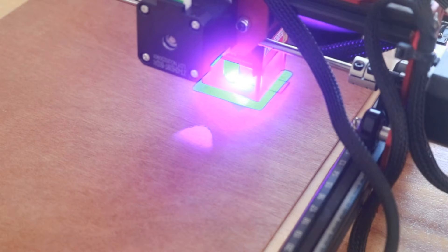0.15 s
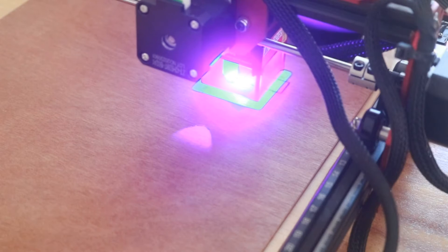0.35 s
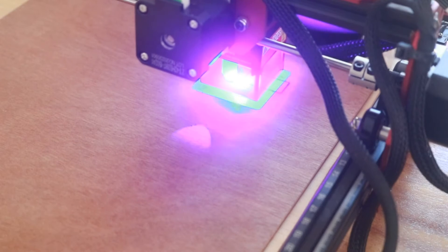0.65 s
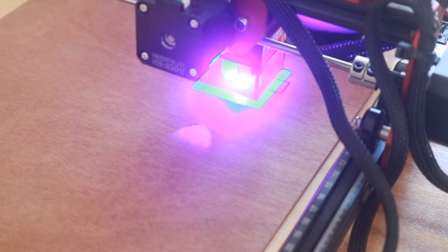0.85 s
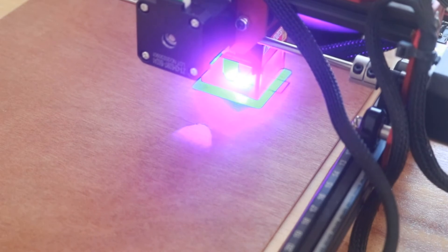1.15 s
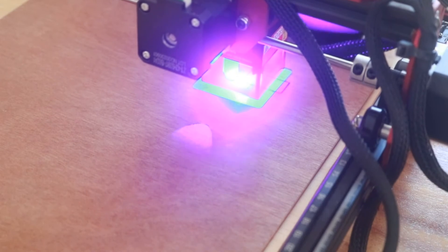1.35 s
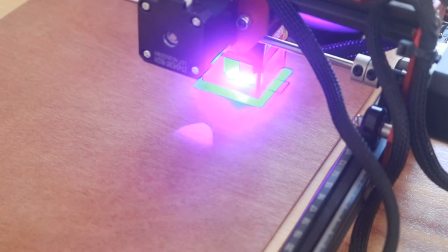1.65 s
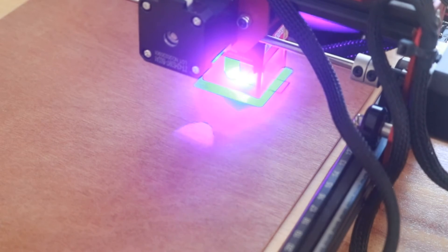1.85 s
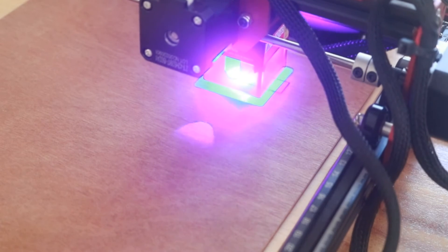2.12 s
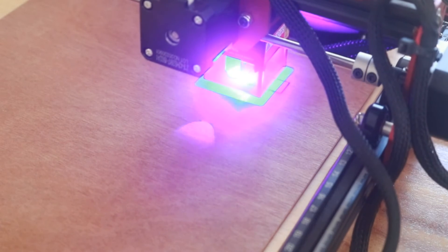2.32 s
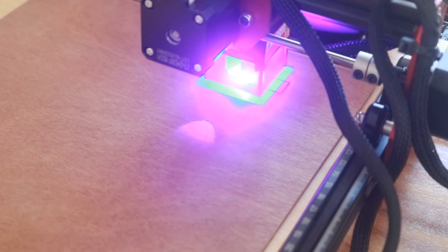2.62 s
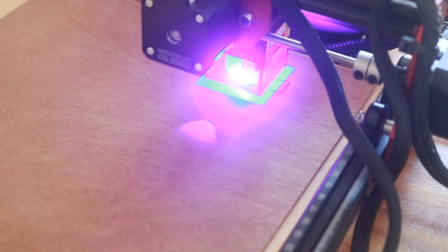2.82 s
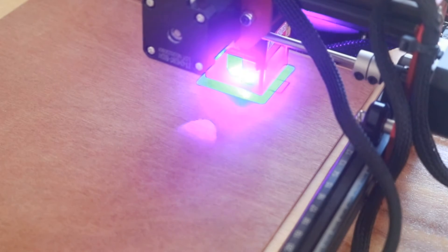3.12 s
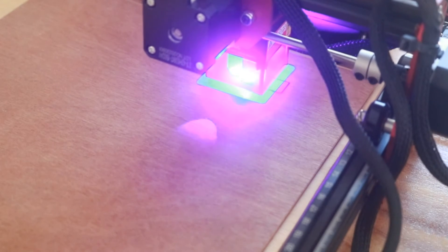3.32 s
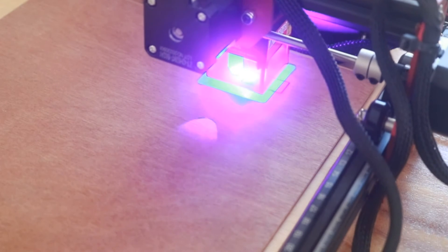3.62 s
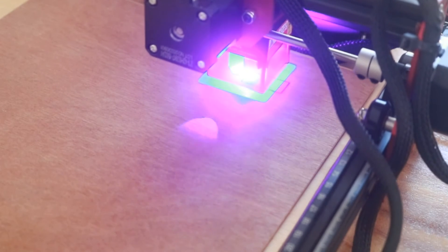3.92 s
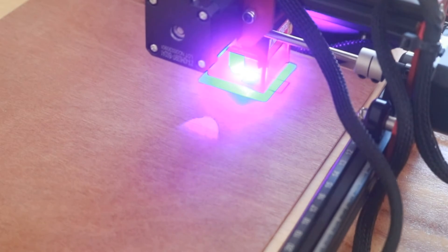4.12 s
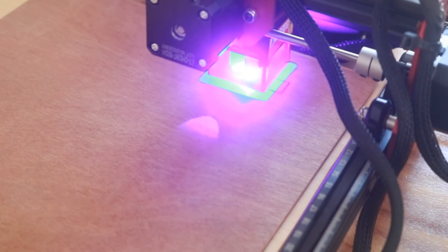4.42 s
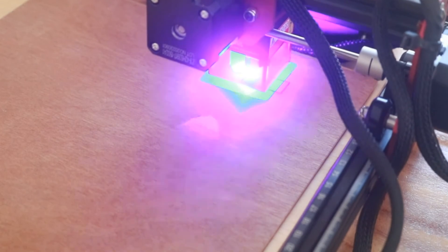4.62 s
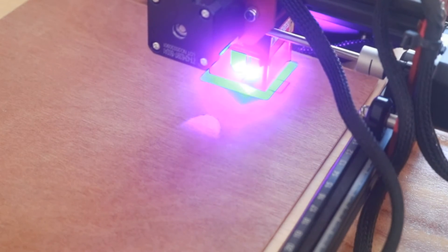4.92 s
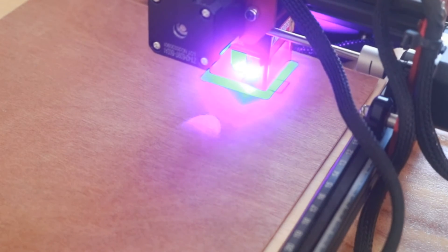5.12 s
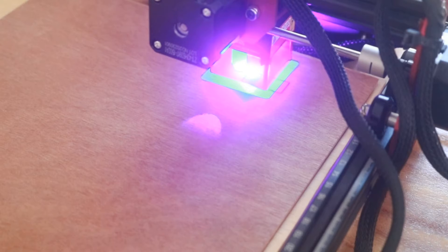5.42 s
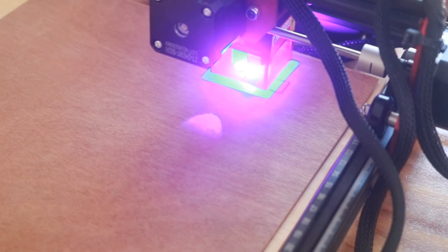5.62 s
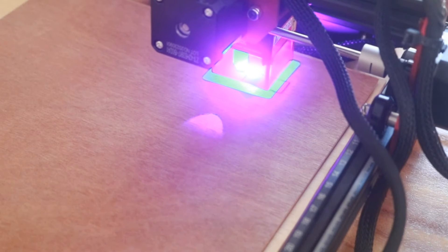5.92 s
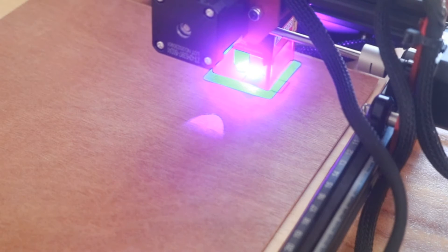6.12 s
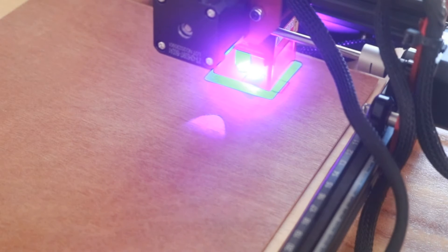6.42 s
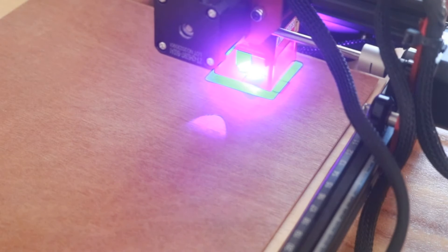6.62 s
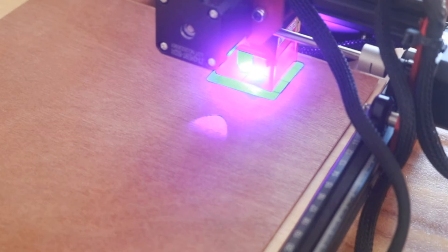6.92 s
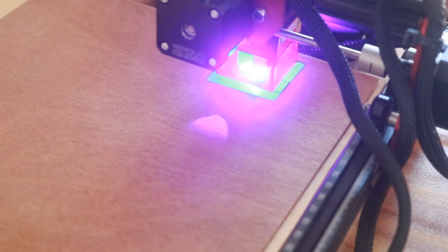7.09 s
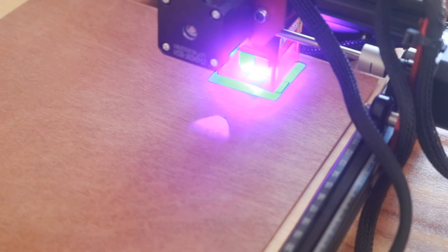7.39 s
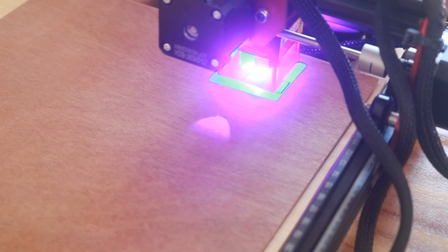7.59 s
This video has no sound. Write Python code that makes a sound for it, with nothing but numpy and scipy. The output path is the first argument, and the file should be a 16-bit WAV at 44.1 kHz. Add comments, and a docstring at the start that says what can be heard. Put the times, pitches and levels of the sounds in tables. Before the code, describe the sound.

Cooling fan air and a thin whine continue over the low hum of a slowly moving laser engraver head.

```python
"""In a workshop, a small laser engraver cuts slowly through plywood. Its stepper motor forces the frame
into vibration at the micro-step rate, and the carriage turns round twice. The cooling fan on the head
whines at its blade-passing frequency over a rush of air, filtered by resonances of housing and table.
Further off, a slower mains motor drones, one of its shaft harmonics beating with its magnetic hum."""
import sys
import numpy as np
from scipy import signal
from scipy.fft import rfft, irfft, next_fast_len
from scipy.io import wavfile

SR = 44100
rng = np.random.default_rng(int(sys.argv[2]) if len(sys.argv) > 2 else 0)


def store_wav(level_fs):
    """Save 16-bit WAV to argv[1]."""
    pcm = np.round(np.clip(np.atleast_2d(level_fs), -1, 1) * 32767)
    wavfile.write(sys.argv[1], SR, pcm.T.astype(np.int16))


N = 341775

# micro-step tone of the frame along the travel: t/s, rms level/dB, left minus right/dB
MICRO_STEP_TONE = [(0, -55, 5.2), (.67, -53.5, 5.2), (.86, -51.5, 5), (1.1, -45.5, 4.9), (2.0, -47, 4.7),
                   (3.5, -47, 4.5), (5.6, -52, 4), (5.9, -50.5, 5.3), (7.75, -50.5, 5.4)]
# carriage reversals: t/s, fade time/s, braking lead/s, braking jolt/dB, restart delay/s,
# restart jolt/dB, delay of first belt tooth/s
REVERSALS = [(0.70, .018, .025, -53, .07, -58, .04), (5.737, .022, .065, -48, .075, -58, .23)]
# partials of uneven, sharp-edged steps: f/full-step rate, outward/dB, homeward/dB, left minus right/dB
STEP_PARTIALS = [ (14, -72, -73, 5), (15, -66, -73, 4), (15.5, -76, -83, 3), (16.5, -75, -75, 7),
                 (17, -70, -76, 5), (18, -74, -71, 4), (19, -78, -86, 6), (20, -78, -84, 5),
                 (160, -82, -88, 3), (176, -86, -73, 0), (288, -86, -92, 5), (320, -87, -92, 6), ]
# blade-passing frequency: t/s, f/Hz
BLADE_RATE = [(0, 1273), (1.2, 1271.9), (4.7, 1273.8), (5.75, 1271.9), (7.3, 1274.7), (7.75, 1275.2)]
# strength of the blade tone: t/s, rms level/dB
BLADE_LEVEL = [(0, -50.5), (1.2, -51.5), (2.8, -50), (3.6, -48), (4.8, -47.3), (5.6, -49.5), (6.2, -47.5),
               (7.75, -47)]
# fan harmonics: f/shaft rate, level/dB re mean blade tone, left minus right/dB, left phase lead/rad
FAN_HARMONICS = [(1, -28, 3, 0), (7, 0, 5.5, .8), (14, -22, -8, .6), (21, -16.5, 2, .2), (28, -32, 4, 0)]
# air noise ahead of the resonances: f/Hz, spectral density level/dB
AIR_SPECTRUM = [(25, -102), (70, -98), (130, -89.5), (420, -90), (660, -84.5), (720, -77), (1240, -76),
                (1320, -83), (2500, -87), (2950, -92), (4200, -95), (8400, -99), (10500, -108),
                (15700, -112)]
# resonances of housing and table (dips if negative): f/Hz, width/Hz, left gain/dB, right gain/dB
RESONANCES = [ (257, 9.7, -5, -5), (338, 48, 3, 2.5), (450, 33, 4, 4), (546, 12, 5, 4.5), (601, 15, 6, 4),
              (652, 21, 8.5, 7), (716, 29, 7.5, 5), (772.4, 35, 7, 6.5), (802, 18, 0.5, 2),
              (884, 19, 5, 5.5), (930, 10, -3, 0), (980, 7.6, -0.5, 0), (1005, 42, 5.5, 2.5),
              (1053, 18, 0.5, 4.5), (1085, 22, 4.5, 5.5), (1114, 18, 9, 7), (1150, 13, -8, 4),
              (1165, 15, 11.5, 4), (1198, 14, 4, 9.5), (1218, 16, -3, -1), (1630, 50, -2, 0.5),
              (1775, 106, 5.5, 5), (1892, 35, 10, 1), (2254, 88, 4.5, 2.5), (2406, 43, 5.5, 3),
              (2840, 30, -4, 2), (3520, 434, 9.5, 10), (4800, 530, 4, 4), (7000, 180, 6, 4.5),
              (11750, 1400, 2, 3), ]
# air noise between left and right: f/Hz, coherence (0-1), left minus right/dB, left phase lead/rad
AIR_COHERENCE = [(40, 0.4, 0, 0), (130, 0.96, 5, -0.21), (716, 0.92, 2.5, -0.28), (1300, 0.62, 2, -0.46),
                 (2180, 0.66, -1.5, -0.42), (2850, 0.36, -1, 0), (3790, 0.93, 3, 0.085),
                 (4270, 0.4, 2.5, -0.22), (4860, 0.75, 3, 0.11), (6200, 0.16, 1, -1),
                 (7800, 0.73, 0.5, -0.38), (9600, 0.4, 3.5, -0.59), (10200, 0.7, 4, -.4),
                 (10600, 1, 0.5, 0)]
# shaft harmonics and magnetic hum of the mains motor: f/Hz, rms level/dB
MAINS_PARTIALS = [(57.9, -88), (86.8, -84), (116.15, -64), (119.9, -78.5)]

FULL_STEP_HZ, MICRO_STEPS = 18.75, 16
BRAKE_S, RESTART_S = .013, .04   # half-widths of the jolts
STEPS_PER_TOOTH = 200 / 16   # full steps a revolution over pulley teeth
TOOTH_DB, TOOTH_SKEW = -67.5, .42   # swing of the hum as a tooth seats; skew: quick rise, slow fall
BLADES, HARMONIC_FADE_DB = 7, 3.0   # all fan tones but the blade tone fade from start to end
ROOM_T60_S, ROOM_SHARE, ROOM_DULL_HZ = .3, .25, 7500
CUTOFF_HZ = 15720
SIDE = np.array([[.5], [-.5]])   # splits a difference between left and right


def stepper():
    """Forced vibration: periodic steps shake the frame; belt teeth and jolts modulate the amplitude."""
    t = np.arange(N) / SR
    drive, jolts, swing = np.ones(N), np.zeros(N), np.zeros(N)
    for turn_s, fade_s, before_s, brake_db, after_s, restart_db, tooth_s in REVERSALS:
        mesh_phase = 2 * np.pi * FULL_STEP_HZ / STEPS_PER_TOOTH * (t - turn_s - tooth_s)
        swing = np.where(t > turn_s, np.sin(mesh_phase) + TOOTH_SKEW * np.sin(2 * mesh_phase), swing)
        drive *= np.clip((t - turn_s) / fade_s, -1, 1)   # passes through zero and changes sign
        jolts += from_db(brake_db) * np.exp(-((t - turn_s + before_s) / BRAKE_S) ** 2)
        jolts += from_db(restart_db) * np.exp(-((t - turn_s - after_s) / RESTART_S) ** 2)
    phase = 2 * np.pi * FULL_STEP_HZ * t   # phase-locked partials throb once a full step
    level_db, pan_db = in_time(MICRO_STEP_TONE)
    envelope = from_db(level_db) + jolts + from_db(TOOTH_DB) * swing
    hum = envelope * tone(MICRO_STEPS * phase, 0, pan_db)
    for order, outward_db, homeward_db, pan_db in STEP_PARTIALS:
        dispersion = .3 * (order - MICRO_STEPS) ** 2   # the frame spreads the phases, rounding the throb
        hum += tone(order * phase + dispersion, np.where(drive > 0, homeward_db, outward_db), pan_db)
    return drive * hum


def fan_tones():
    """Blade passage: a rotor radiates harmonics of its shaft rate, which waver in turbulent inflow."""
    (blade_hz,), (blade_db,) = in_time(BLADE_RATE), in_time(BLADE_LEVEL)
    shaft_phase = 2 * np.pi * np.cumsum(blade_hz + .2 * drift(3)) / SR / BLADES
    fading_db = blade_db.mean() - HARMONIC_FADE_DB * np.linspace(-.5, .5, N)
    whine = np.zeros((2, N))
    for order, relative_db, pan_db, lead in FAN_HARMONICS:
        level_db = (blade_db if order == BLADES else fading_db) + relative_db + .97 * drift(12.5)
        whine += tone(order * shaft_phase, level_db, pan_db, lead)
    return whine


def air_rush():
    """Source and filter: resonances colour broadband flow noise, partly coherent from left to right."""
    size = next_fast_len(N)
    hz = np.arange(size // 2 + 1) * SR / size
    noise = rfft(rng.standard_normal((3, size)))
    source, scatter = noise[0], noise[1:]
    diffuse = diffuse_field(source, scatter, hz, size)
    coherence, pan_db, lead = at_hz(AIR_COHERENCE, hz)
    direct = source * np.exp(1j * lead * SIDE)
    field = np.sqrt(coherence) * direct + np.sqrt(1 - coherence) * diffuse
    level_db = at_hz(AIR_SPECTRUM, hz)[0] + pan_db * SIDE
    for centre_hz, width_hz, left_db, right_db in RESONANCES:
        level_db += np.array([[left_db], [right_db]]) / (1 + (2 * (hz - centre_hz) / width_hz) ** 2)
    rush = irfft(field * from_db(level_db) * np.sqrt(SR / 2), size)[:, :N]
    return rush * from_db(.23 * drift(2.2))


def diffuse_field(source, scatter, hz, size):
    """Reverberation: the source's exponentially decaying echo joins unrelated scatter, as spectra."""
    tails = rng.standard_normal((2, SR // 2)) * from_db(-60 * np.arange(SR // 2) / SR / ROOM_T60_S)
    tails /= np.sqrt(np.sum(tails ** 2, axis=1, keepdims=True))
    echo = rfft(tails, size) * source
    share = ROOM_SHARE / (1 + (hz / ROOM_DULL_HZ) ** 2)   # walls absorb the treble
    return np.sqrt(share) * echo + np.sqrt(1 - share) * scatter


def mains_motor():
    """Beating: among the low partials, the fourth shaft harmonic interferes with the magnetic hum."""
    t = np.arange(N) / SR
    return sum(tone(2 * np.pi * hz * t, db + .95 * drift(4.9), pan_db=3.5) for hz, db in MAINS_PARTIALS)


def tone(phase, rms_db, pan_db, lead=0):
    """Simple harmonic motion, with a level and a phase difference between left and right."""
    return np.sqrt(2) * from_db(rms_db + pan_db * SIDE) * np.cos(phase + lead * SIDE)


def drift(corner_hz):
    """Random fluctuation of unit variance: noise at every 40th sample through a two-pole low-pass."""
    pole = np.exp(-2 * np.pi * corner_hz * 40 / SR)
    slow = signal.lfilter([1], [1, -2 * pole, pole * pole], rng.standard_normal(N // 40 + 2002))[2000:]
    return np.interp(np.arange(N) / 40, np.arange(len(slow)), slow / slow.std())


def from_db(db):
    """Amplitude ratio of a level."""
    return 10 ** (np.asarray(db) / 20)


def in_time(rows):
    """Linear interpolation of each column in time."""
    times, *columns = np.transpose(rows)
    return [np.interp(np.arange(N) / SR, times, column) for column in columns]


def at_hz(rows, hz):
    """Interpolation of each column in logarithmic frequency."""
    centres, *columns = np.transpose(rows)
    return [np.interp(np.log(hz + 1), np.log(centres), column) for column in columns]


def scene():
    """Superposition: the sound pressures of the four sources add."""
    return stepper() + fan_tones() + mains_motor() + air_rush()


def record(dry):
    """Band limiting: an elliptic low-pass cuts the highest treble steeply."""
    return signal.sosfilt(signal.ellip(12, .2, 80, CUTOFF_HZ, fs=SR, output="sos"), dry)


dry = scene()
out = record(dry)
store_wav(out)
```